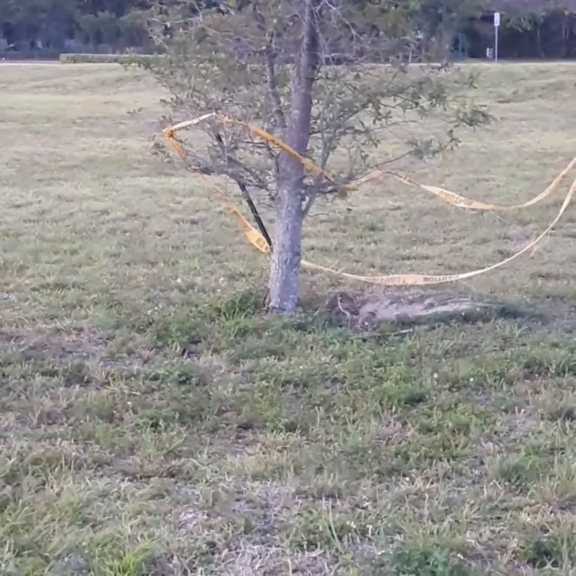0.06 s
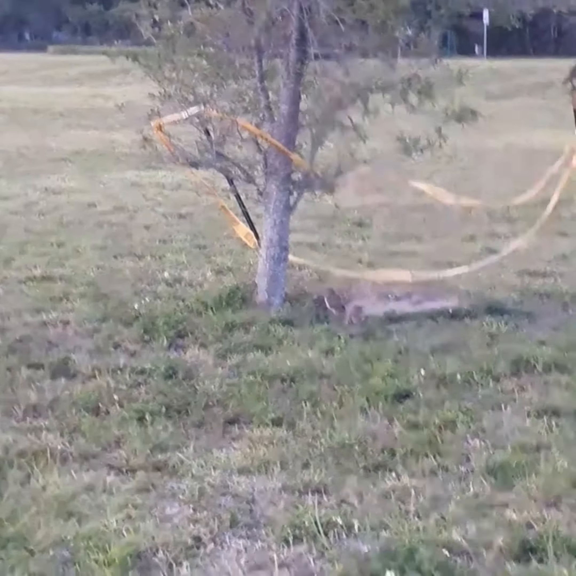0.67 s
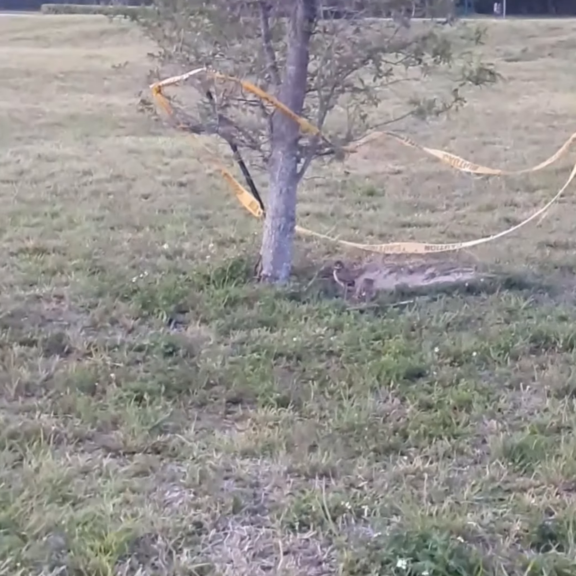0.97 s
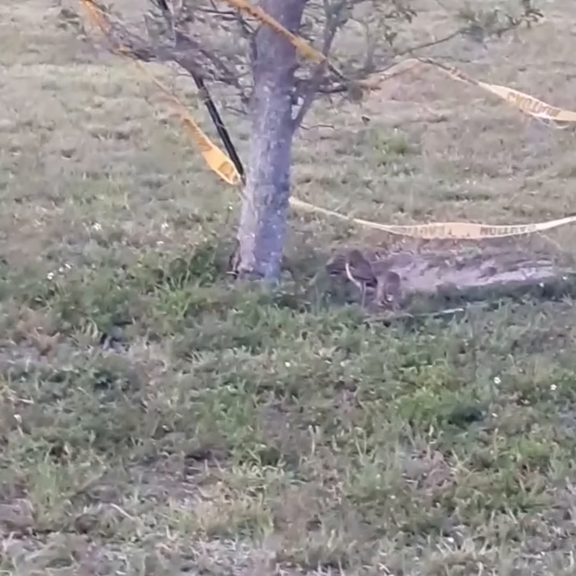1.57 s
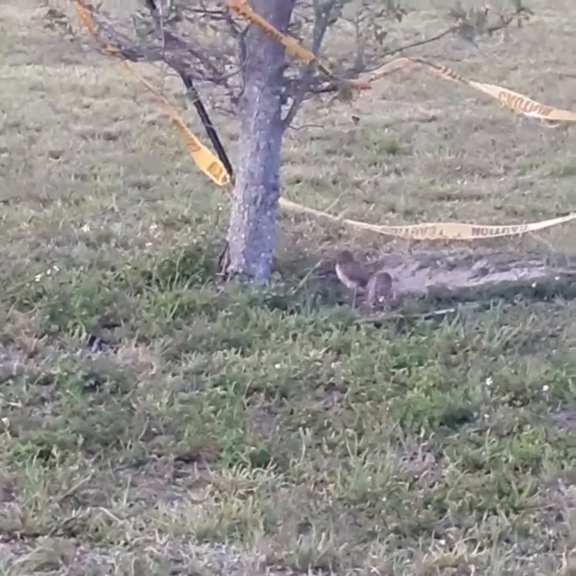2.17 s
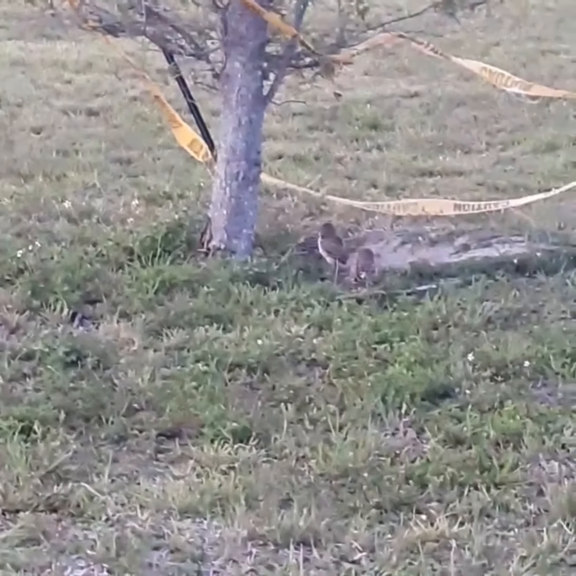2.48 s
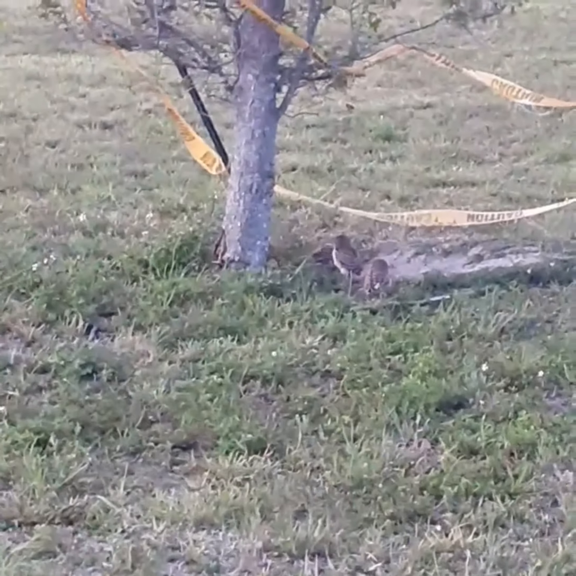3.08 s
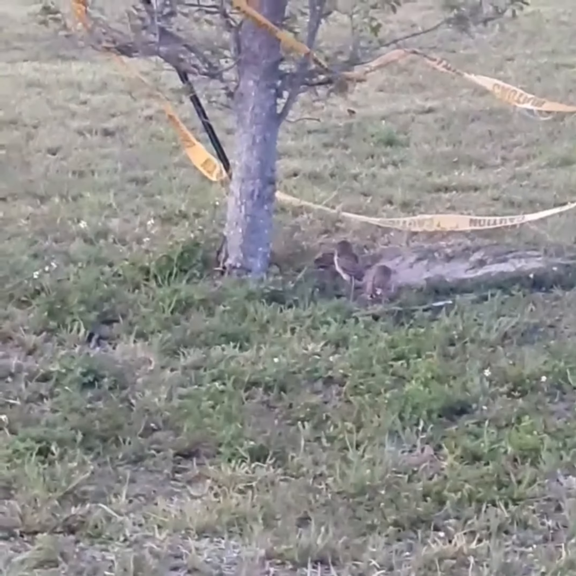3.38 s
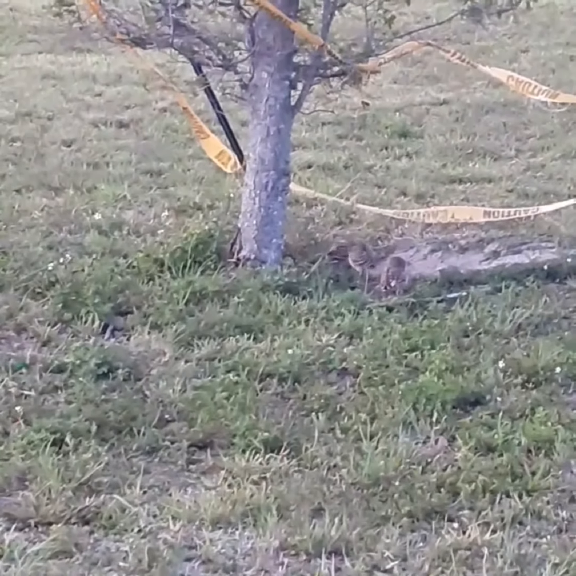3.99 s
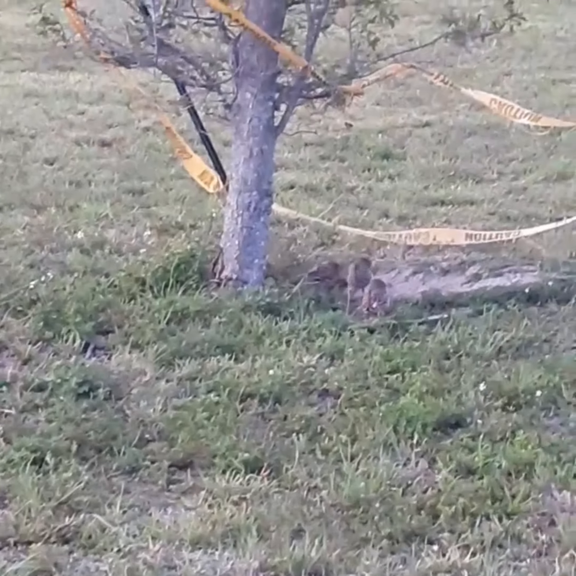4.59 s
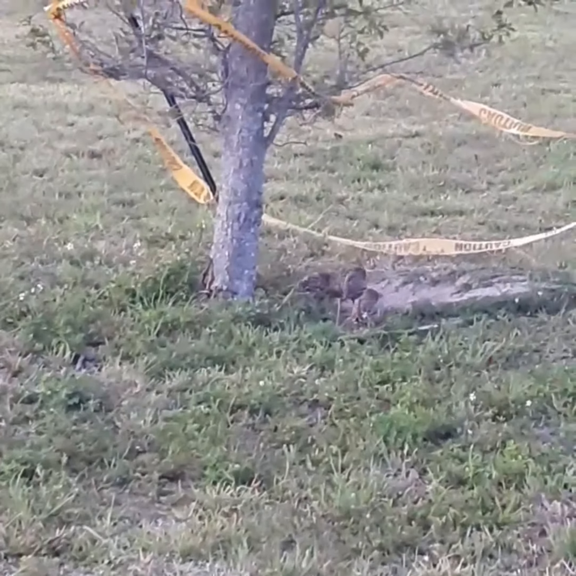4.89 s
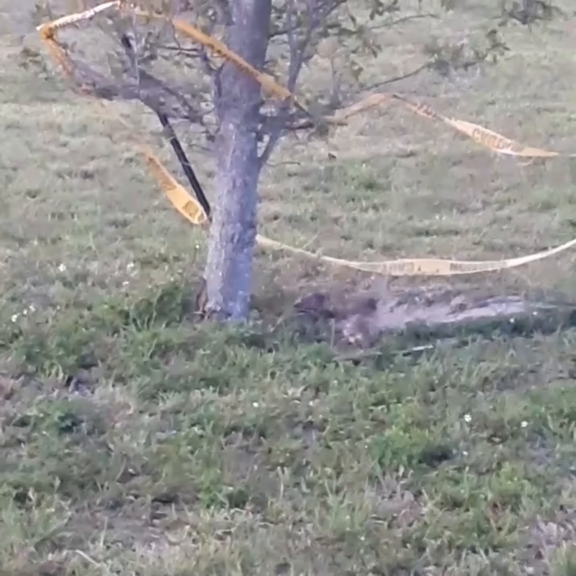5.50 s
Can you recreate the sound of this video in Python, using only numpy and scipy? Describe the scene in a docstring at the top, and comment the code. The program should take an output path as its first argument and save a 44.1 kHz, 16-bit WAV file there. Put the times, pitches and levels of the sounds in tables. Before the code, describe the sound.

Wind rumbles on the microphone in an open field while a young owl hisses hoarsely three times, with distant road noise behind.

```python
"""An open field. From the start, wind buffets a phone's two microphone openings, mostly the right one,
over the tyre roar of a distant road and far insects in the grass. Almost at once an owl chick begs
beside its burrow, forcing air through its throat in a raspy hiss. Small birds whistle far off, and the
first of three tiny ticks follows. A second hiss comes at 2 s, then the hardest thumps of wind.
Nearer insects buzz from about 3 s, and a third hiss comes just after 5 s."""
import sys
import numpy as np
from scipy import signal
from scipy.fft import rfft, irfft
from scipy.io import wavfile

SR = 44100
rng = np.random.default_rng(int(sys.argv[2]) if len(sys.argv) > 2 else 0)


def log_audio(samples):
    """Write samples as a 16-bit WAV file to the path given in sys.argv[1]."""
    # one column per channel
    frames = np.atleast_2d(samples).T
    # limit to full scale, then quantise
    limited = np.clip(frames, -1, 1)
    pcm = np.round(limited * 32767).astype(np.int16)
    wavfile.write(sys.argv[1], SR, pcm)


N = 253134
TIME = np.arange(N) / SR
FREQS = np.fft.rfftfreq(N, 1 / SR)


def undb(db):
    """Turn decibels into a number to multiply by."""
    return 10 ** (np.asarray(db) / 20)


def unit(x):
    """Scale a sound to an average strength (rms) of 1."""
    return x / np.sqrt(np.mean(x ** 2))


def curves(table):
    """Join the timed points of a table with straight lines, one curve for each value column."""
    times, *columns = np.transpose(table)
    return [np.interp(TIME, times, column) for column in columns]


def held(start, end, rise_s, fall_s):
    """A loudness shape that is 1 from start to end and dies away on both sides."""
    return np.exp(np.minimum(TIME - start, 0) / rise_s - np.maximum(TIME - end, 0) / fall_s)


def phase(hz):
    """The running angle of a vibration whose speed may change."""
    return 2 * np.pi * np.cumsum(hz) / SR


def noise():
    """White noise: all pitches equally strong."""
    return rng.standard_normal(N)


def walk(rate):
    """A smooth random wander of size 1 that turns about rate times a second."""
    return unit(irfft(rfft(noise()) * np.exp(-(FREQS / rate) ** 2), N))


def colour(x, points):
    """Shape the lows and highs by (frequency_hz, level_db) points; the result has strength 1."""
    hz, db = np.transpose(points)
    gain = undb(np.interp(np.log(FREQS + 1), np.log(hz), db))
    return unit(irfft(rfft(x) * gain, N))


def resonate(x, hz, width_hz):
    """Make a sound ring around one pitch; the result has strength 1."""
    b, a = signal.iirpeak(hz, hz / width_hz, fs=SR)
    return unit(signal.lfilter(b, a, signal.lfilter(b, a, x)))


def two_mics(x, lag_ms, right_db):
    """A sound from one side reaches the right microphone later, and at a different level."""
    late = irfft(rfft(x) * np.exp(-2j * np.pi * FREQS * lag_ms / 1000), N)
    return np.array([x * undb(-right_db / 2), late * undb(right_db / 2)])


def scatter(x, fade_s, db):
    """Grass and trees throw back a soft echo, different on each side, that drops 60 dB in fade_s."""
    tails = rng.standard_normal((2, SR)) * np.exp(-np.log(1000) * TIME[:SR] / fade_s)
    echoes = [signal.fftconvolve(x, tail / np.linalg.norm(tail))[:N] for tail in tails]
    return undb(db) * np.array(echoes)


def eddy(time_s, hz, core_cycles=0.59):
    """A swirl of air thumps: the pressure drops sharply in its core and swings back on both sides."""
    out, cycles = np.zeros(N), (TIME - time_s) * hz
    near = np.abs(cycles) < 5
    out[near] = -np.cos(2 * np.pi * cycles[near]) / (1 + (cycles[near] / core_cycles) ** 2) ** 2
    return out


# The light breeze between gusts: time_s, left_db, right_db
BREEZE = [(0, -72, -48), (.6, -68, -59), (1.15, -56, -45.5), (1.8, -58, -52), (2.8, -57, -39.5),
          (3.6, -60, -55.5), (4.15, -69, -55.5), (5.1, -58.5, -53.5), (5.74, -71, -62)]
# Gusts: start_s, end_s, level_db, side (0 left, 1 right)
GUSTS = [(0, 0.326, -35.5, 1), (0.682, 0.905, -39, 1), (.88, 0.969, -46, 0), (1.196, 1.52, -47, 0),
         (1.346, 1.405, -38, 1), (2.002, 2.155, -40.5, 1), (2.066, 2.178, -43.5, 0), (2.3, 2.401, -42.5, 0),
         (2.33, 2.393, -38.5, 1), (2.491, 2.687, -33.5, 1), (2.887, 3.14, -41.5, 1), (3.813, 3.85, -44, 1),
         (4.83, 4.874, -45.5, 1)]
# The tone of the wind's rumble: frequency_hz, relative_db
WIND_COLOUR = [(20, -23), (35, -10.5), (52, -3.5), (80, 1.5), (120, -1.5), (170, -9.5), (240, -17),
               (380, -38.5), (600, -51.5), (1300, -67.5)]
# The strongest swirls that hit a microphone: time_s, pitch_hz, peak_db, side (0 left, 1 right)
BIG_EDDIES = [(.027, 92, -30, 1), (.071, 97, -32, 1), (0.121, 146, -23.5, 1), (0.716, 100, -29.5, 1),
              (0.912, 130, -31, 1), (1.353, 102, -30.5, 1), (1.824, 82.5, -33.5, 1), (1.978, 103, -20.5, 1),
              (2.097, 98, -22.5, 0), (2.486, 113, -23.5, 1), (2.553, 141, -24, 1), (2.784, 174, -16, 1),
              (2.842, 130, -14.5, 1), (3.352, 100, -24.5, 1), (3.542, 93, -27.5, 1), (4.002, 107, -33, 1),
              (4.484, 110, -34.5, 1), (4.791, 113, -32.5, 1), (4.852, 77, -31, 1), (5.076, 96, -32, 1)]


def wind(flutter_hz=340, strong_gust_db=-33, eddy_hz=100, eddy_boost_db=11.5, leak_db=-29):
    """Air churns and rumbles at each microphone; strong gusts add a flutter, swirls add thumps."""
    out = np.zeros((2, N))
    for mic, breeze_db in enumerate(curves(BREEZE)):
        gusts = [undb(db) * held(start, end, rise_s=0.047, fall_s=0.029)
                 for start, end, db, side in GUSTS if side == mic]
        flow = np.max([undb(breeze_db), *gusts], axis=0)
        churn = flow * undb(2 * walk(27))
        flutter = resonate(noise(), flutter_hz, width_hz=330) * undb(-59 + 5.1 * walk(42))
        flutter *= (churn / undb(strong_gust_db)) ** 1.9  # grows faster than the rumble
        small_eddies = sum(eddy(when * TIME[-1], eddy_hz * (1 + 0.34 * (2 * pitch_draw - 1)))
                           for when, pitch_draw in rng.random(size=(24, 2)))
        rumble = colour(noise(), WIND_COLOUR) * churn
        out[mic] = rumble + flutter + small_eddies * flow * undb(eddy_boost_db)
        for time_s, hz, db, side in BIG_EDDIES:
            out[mic] += eddy(time_s, hz) * undb(db if side == mic else db + leak_db)
    return out


# The tone of the distant tyre roar: frequency_hz, relative_db
ROAR_COLOUR = [(40, -2.5), (70, 13.5), (130, 3.5), (220, -6.5), (370, -15), (580, -11.5), (780, -5.5),
               (1000, 2.5), (1330, -8.5), (1850, -13), (2600, -27.5), (3200, -33.5), (4500, -38.5),
               (11000, -58)]
# How the roar rises and falls: time_s, relative_db
TRAFFIC = [(0, -55.5), (.8, -59), (1.7, -60.5), (2.35, -57.5), (2.8, -58.5), (3.3, -60), (5.05, -59.5),
           (5.74, -60.5)]
# The tone of the tyre tread's brighter hiss: frequency_hz, relative_db
TREAD_COLOUR = [(700, -17.5), (1250, -2), (1500, 2), (1900, -2), (2250, -11.5), (2750, -17), (3200, -35),
                (4500, -52)]
# Passing cars that swell that hiss: time_s, half_length_s, relative_db
CARS = [(1.45, 0.22, -60), (2.29, 0.57, -64), (3.298, 0.22, -67.5), (4.415, 0.3, -55),
        (4.872, 0.049, -54.5)]


def road(roar_gain_db=6, tread_gain_db=-5, between_cars_db=-66.5, directions=5):
    """Tyre roar arrives from along a far road; passing cars brighten it."""
    traffic_db, = curves(TRAFFIC)
    car_power = sum((undb(db) / (1 + ((TIME - time_s) / half_s) ** 2)) ** 2
                    for time_s, half_s, db in CARS)
    tread_level = np.sqrt(undb(between_cars_db) ** 2 + car_power)
    out = 0
    for direction in np.linspace(-1, 1, directions):
        roar = colour(noise(), ROAR_COLOUR) * undb(traffic_db + roar_gain_db + 2.24 * walk(11))
        tread = colour(noise(), TREAD_COLOUR) * tread_level * undb(tread_gain_db + 2.1 * walk(13))
        out += two_mics(roar + tread, lag_ms=0.14 + 0.15 * direction, right_db=-0.1)
    return out / np.sqrt(directions)


# The tone of the open air: frequency_hz, relative_db
AIR_COLOUR = [(1500, 0), (4000, -8.5), (5200, -4.5), (7500, 2), (10200, 2), (11500, -9.5)]


def open_air(level_db=-82):
    """A faint, even hiss, different on each side."""
    return np.array([colour(noise(), AIR_COLOUR) for _ in range(2)]) * undb(level_db)


# Far insects taking turns: start_s, end_s, pitch_hz, level_db
INSECT_TURNS = [(.55, 0.91, 6480, -77), (1.302, 1.7, 6430, -82), (2, 2.3, 6300, -75),
                (2.4, 2.7, 6430, -81.5), (3.373, 3.62, 6560, -80.5), (4.207, 4.45, 6500, -84),
                (4.94, 5.3, 6450, -80), (5.5, 5.74, 6500, -87)]


def far_insects(steady_hz=6480, steady_db=-81, width_hz=750, fade_s=0.03):
    """Far buzzes blur into one high, steady sound that swells as each insect joins in."""
    out = np.zeros((2, N))
    for mic in range(2):
        out[mic] = resonate(noise() * undb(1.5 * walk(100)), steady_hz, width_hz) * undb(steady_db)
        buzzing = noise() * undb(2.4 * walk(100))
        for start, end, hz, db in INSECT_TURNS:
            out[mic] += resonate(buzzing, hz, width_hz) * undb(db) * held(start, end, fade_s, fade_s)
    return out


# The chicks' hisses: start_s, swell_s, end_s, end_level_db, fade_db_per_s, puffs_per_s, flutter_db
HISSES = [(.16, 0.1, 0.575, -61, 600, 320, 0.5), (2.07, 0.14, 2.392, -65, 98, 330, 1.5),
          (5.21, 0.096, 5.595, -63, 600, 283, 2.5)]
# How throat and beak ring, one list for each hiss: frequency_hz, relative_db
THROATS = [
    [(1200, -40), (2400, -14), (3550, -7.5), (3950, -2), (5000, -3.5), (5900, -1.5), (6400, 0), (6900, -8),
     (7400, -14), (8550, -13), (9000, -5.5), (11000, -21)],
    [(1200, -33), (2400, -14), (3850, -9), (4400, 0.5), (5200, -2.5), (6200, 3), (7300, -15), (8500, -11.5),
     (9800, -13), (10400, -15), (11500, -22)],
    [(1200, -43), (3200, -30), (4000, -11), (4600, -18), (5000, -5.5), (5700, -0.5), (6400, 0), (7300, -12),
     (8600, -16), (9100, -14), (11000, -24.5)],
]


def owl_hisses(rise_db_per_s=19, rasp_db=2.5, bright_hz=7500, beak_hz=4700, closed_db=-9):
    """A chick pushes air through its voice box in uneven puffs, ever harder, and its throat rings."""
    below_bright = signal.butter(2, bright_hz, fs=SR, output="sos")
    below_beak = signal.butter(10, beak_hz, fs=SR, output="sos")
    out = np.zeros(N)
    for (start, swell, end, db, fade_rate, puff_rate, flutter_db), throat in zip(HISSES, THROATS):
        push_db = rise_db_per_s * np.minimum(TIME - end, 0) - fade_rate * np.maximum(TIME - end, 0)
        effort = np.clip((TIME - start) / swell, 0, 1) * undb(push_db)
        cycle = phase(puff_rate * (1 + 0.35 * walk(190)))
        puffs = unit(undb(rasp_db * np.cos(cycle) + flutter_db * walk(110)))
        breath = colour(noise() * puffs, throat)
        body = signal.sosfiltfilt(below_bright, breath)
        low = signal.sosfiltfilt(below_beak, body)
        middle = body - low
        high = (breath - body) * effort ** 0.49  # a harder push sounds brighter
        # The beak opens 0.14 s into the hiss and lets the low part out.
        closed = (1 - np.tanh((TIME - start - 0.14) / 0.02)) / 2
        out += (low * undb(closed_db * closed) + middle + high) * effort * undb(db)
        out += squeals(start, end + swell, puffs)
    return out


# Squeals that break through the hisses: start_s, end_s, pitch_hz, glide_hz, level_db
SQUEALS = [(0.187, .3, 5140, 218, -71), (0.276, 0.429, 4350, 124, -73), (0.307, 0.478, 5850, 96, -69),
           (0.486, .565, 5220, -8, -60), (0.55, 0.601, 4890, -1800, -63.5), (2.116, 2.43, 5200, 1, -74),
           (2.388, 2.462, 4670, -600, -73), (5.287, 5.345, 5650, -100, -68.5),
           (5.369, 5.54, 5520, 133, -66), (5.555, 5.62, 5720, -800, -71)]


def squeals(hiss_start, hiss_end, puffs, smear_hz=130, fade_s=0.029):
    """The thin skin in the voice box never settles on one pitch, so each squeal is hoarse."""
    smear = walk(smear_hz) + 1j * walk(smear_hz)  # shakes both pitch and loudness
    out = np.zeros(N)
    for start, end, hz, glide_hz, db in SQUEALS:
        if end > hiss_start and start < hiss_end:
            pitch = hz + glide_hz * np.clip((TIME - start) / (end - start), 0, 1)
            squeal = unit(puffs * np.real(smear * np.exp(1j * phase(pitch))))
            fade = np.clip(np.minimum(TIME - start, end - TIME) / fade_s, 0, 1)
            out += squeal * undb(db) * fade
    return out


def owls_at_burrow(gain_db=1.5):
    """The calls arrive from some metres away, with echoes from the ground and the far trees."""
    calls = undb(gain_db) * owl_hisses()
    ground = scatter(calls, fade_s=0.015, db=-3)
    trees = scatter(calls, fade_s=0.18, db=-8)
    return two_mics(calls, lag_ms=0.3843, right_db=-3.5) + ground + trees


def bird_note(start, length, pitches, db, right_db, wobble):
    """One whistled note that glides through a start, middle and end pitch."""
    out, playing = np.zeros((2, N)), (TIME >= start) & (TIME < start + length)
    progress = (TIME[playing] - start) / length
    glide = np.polyval(np.polyfit([0, 0.5, 1], pitches, 2), progress)
    swell = np.sqrt(2 * np.abs(np.sin(np.pi * progress)))
    tone = swell * np.sin(phase(glide * wobble[playing]))
    out[:, playing] = undb([db - right_db / 2, db + right_db / 2])[:, None] * tone
    return out


# Thin whistles and one low coo: start_s, length_s, pitch_hz, relative_db, right_minus_left_db
WHISTLES = [(.833, 0.055, 2404, -70, 3), (1.022, 0.041, 3200, -85, 1), (1.25, 0.039, 3270, -79, -7),
            (1.533, 0.099, 2417, -68, 12), (1.547, 0.14, 2660, -75, 15), (1.887, 0.12, 2310, -66, -7),
            (1.95, 0.18, 2593, -75.5, 9), (2.496, .11, 3260, -83, 20), (2.615, 0.073, 3140, -77, 17),
            (2.584, 0.14, 469, -59.5, 0)]
# Quick falling chirps: start_s, length_s, start_hz, fall_hz, relative_db, right_minus_left_db
CHIRPS = [(1.7, .035, 8930, 600, -78.5, -4), (1.738, 0.051, 2990, 520, -72, 13),
          (1.74, .032, 3750, 400, -83, 17), (3.515, 0.039, 3980, 1706, -66, -3),
          (3.538, .045, 5120, 2230, -78, 0)]


def birds(song_start_s=0.712, song_step_s=0.216, song_hz=(2530, 3090, 2996), sag_share=0.0445):
    """One far bird repeats an arched note while others whistle, chirp and coo; trees blur them."""
    wobble = 1 + 0.022 * walk(260)
    out = np.zeros((2, N))
    for k in range(4):
        start = song_start_s + k * song_step_s
        out += bird_note(start, length=0.069, pitches=song_hz, db=-74 - 0.7 * k,
                         right_db=4, wobble=wobble)
    for start, length, hz, db, right_db in WHISTLES:
        pitches = hz * (1 - sag_share * np.array([0, 0.5, 1]))
        out += bird_note(start, length, pitches, db, right_db, wobble)
    for start, length, hz, fall_hz, db, right_db in CHIRPS:
        pitches = hz - fall_hz * np.array([0, 0.67, 1])  # most of the fall comes early
        out += bird_note(start, length, pitches, db, right_db, wobble)
    return out * undb(-3) + scatter(out.mean(axis=0), fade_s=0.7, db=-2.5)


# Small ticks and taps nearby: time_s, pitch_hz, width_hz, decay_s, left_peak_db, right_peak_db
TICKS = [(1.409, 2200, 9000, 0.00011, -43, -55), (2.381, 860, 260, 0.0059, -42, -49),
         (3.735, 9770, 600, 0.00082, -72, -52.5)]


def ticks():
    """Each dry tick is a burst of noise that rings around one pitch and dies at once."""
    out = 0
    for time_s, hz, width_hz, decay_s, left_db, right_db in TICKS:
        burst = noise() * (TIME >= time_s) * np.exp(-np.abs(TIME - time_s) / decay_s)
        tick = resonate(burst, hz, width_hz)
        out += undb([left_db, right_db])[:, None] * tick / np.abs(tick).max()
    return out


# Nearer insects: start_s, end_s, pitch_hz, wing_strokes_per_s, level_db, right_minus_left_db
BUZZES = [(2.818, 3.222, 6870, 140, -84.5, 16), (3.548, 4.033, 6630, 120, -72, 8.5),
          (4.445, 4.81, 7160, 71, -80, 4)]


def near_insects(swell_s=0.093, stop_s=0.008, stroke_db=7, sweep_hz=230):
    """Each wing stroke makes a pulse of high tone whose pitch sags as it runs."""
    out = np.zeros((2, N))
    for start, end, hz, stroke_rate, db, right_db in BUZZES:
        cycle = phase(stroke_rate * (1 + 0.014 * walk(6.8)))
        pitch = hz - sweep_hz * np.sin(cycle) + 100 * walk(460)
        strokes = undb(stroke_db * np.cos(cycle) + walk(60))
        fade = np.clip((TIME - start) / swell_s, 0, 1) * np.clip((end - TIME) / stop_s, 0, 1)
        buzz = unit(strokes * np.sin(phase(pitch))) * undb(db) * fade
        out += two_mics(buzz, lag_ms=0.375, right_db=right_db) + scatter(buzz, fade_s=0.29, db=-9)
    return out


def scene():
    """Everything in the field, as the two microphones hear it."""
    fade_in = np.minimum(TIME / 0.004, 1)
    field = owls_at_burrow() + wind() + road() + open_air() + far_insects()
    return fade_in * (field + near_insects() + birds() + ticks())


def record(dry, low_cut_hz=37, high_cut_hz=11600):
    """The phone thins the deepest rumble and cuts off the highest sounds."""
    low_cut = signal.butter(4, low_cut_hz, btype="highpass", fs=SR, output="sos")
    high_cut = signal.ellip(8, 0.2, 60, high_cut_hz, fs=SR, output="sos")
    return signal.sosfilt(high_cut, signal.sosfilt(low_cut, dry))


dry = scene()
out = record(dry)
log_audio(out)
```